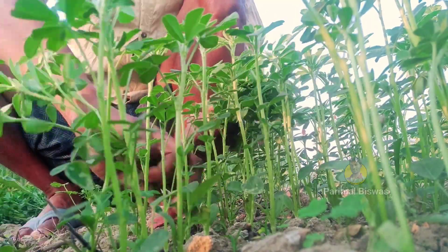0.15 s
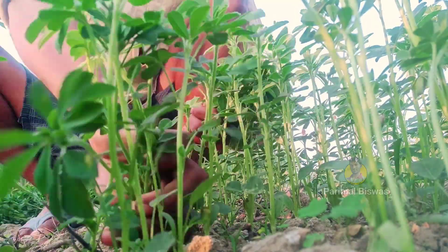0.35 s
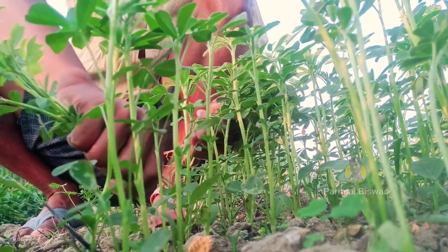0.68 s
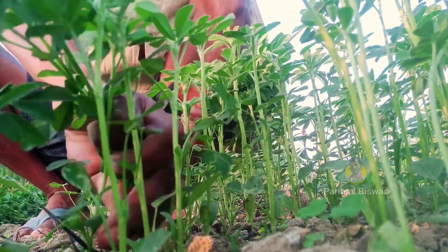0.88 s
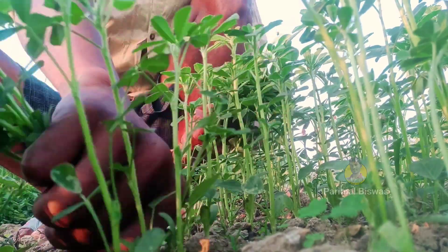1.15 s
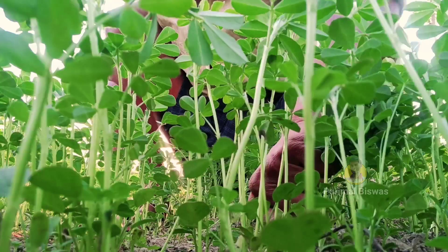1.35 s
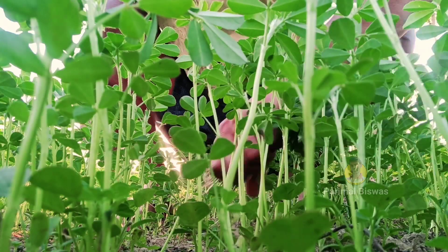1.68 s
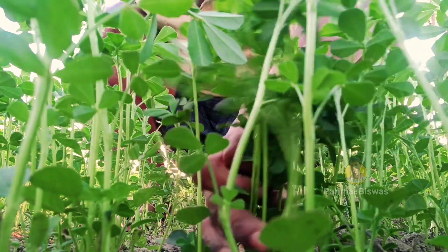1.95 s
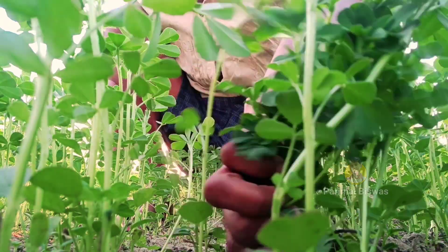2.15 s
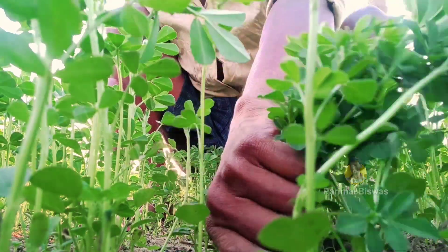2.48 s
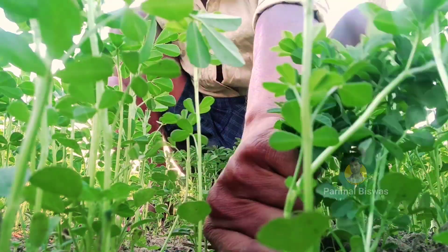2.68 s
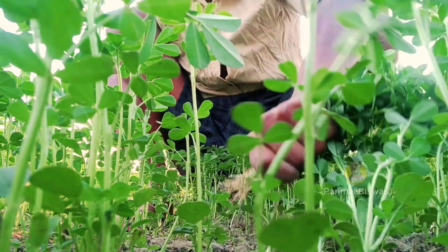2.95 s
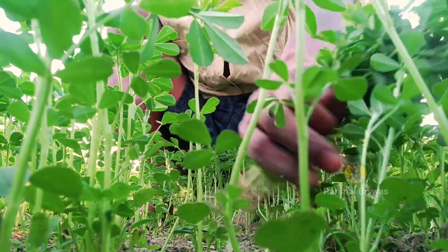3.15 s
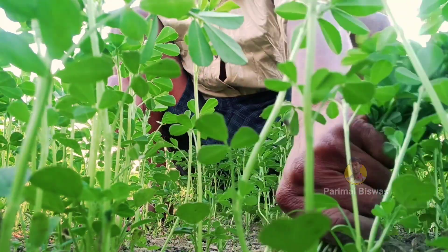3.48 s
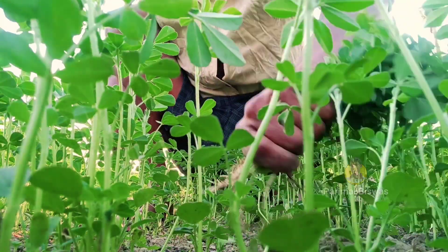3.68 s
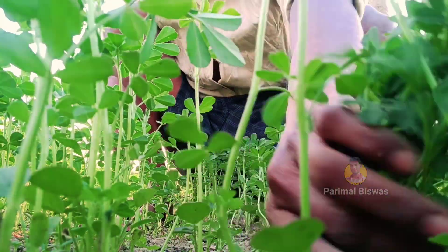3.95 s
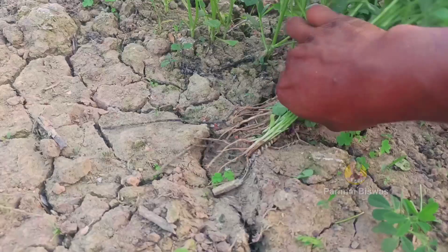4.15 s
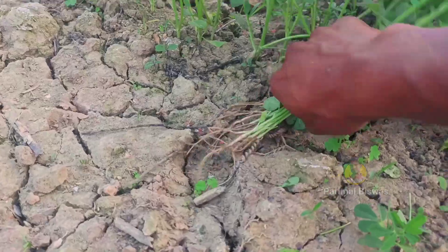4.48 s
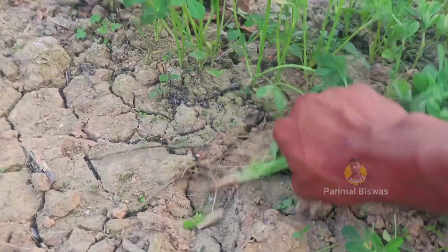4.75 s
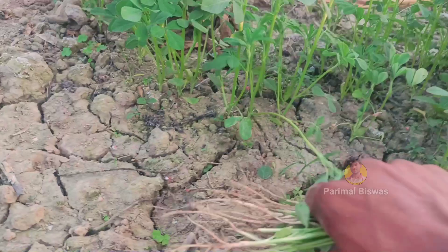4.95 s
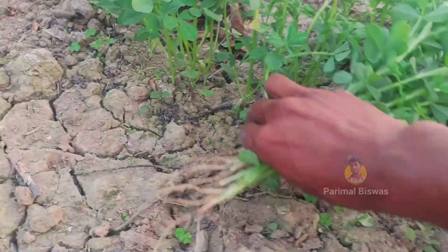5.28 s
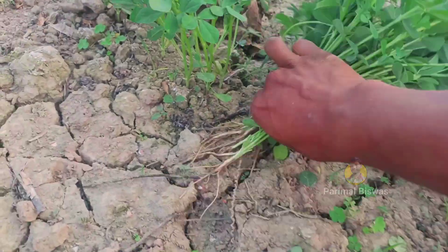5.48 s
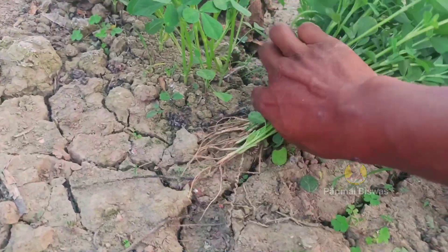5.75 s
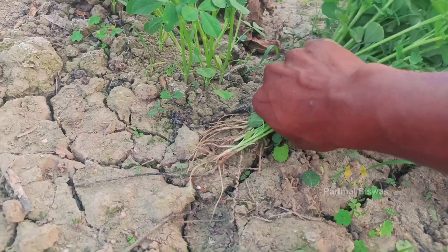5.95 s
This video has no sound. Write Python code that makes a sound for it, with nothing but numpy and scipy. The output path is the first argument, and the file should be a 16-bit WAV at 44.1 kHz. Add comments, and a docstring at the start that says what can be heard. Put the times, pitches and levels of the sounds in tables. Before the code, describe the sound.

Close to the microphone in an open field, a hand pulls bunches of leafy plants from dry soil. Leaves rustle and thin stalks tick throughout. About six pulls each bring sharp root snaps with small dull thumps and trickling crumbs, the biggest cluster near the middle. A low outdoor rumble runs underneath, and toward the end a distant bird whistles faintly.

```python
"""Bunches of leafy plants pulled by hand from dry soil, close to the microphone in an open field.
Leaves rustle and thin stalks tick in the grip. With each pull roots snap one after another:
tearing fibres ring the stem, the unloaded ground thumps, crumbs of soil trickle.
A low outdoor rumble runs underneath; late on, a bird whistles some way off."""
import sys
import numpy as np
from scipy import signal
from scipy.fft import rfft, irfft, next_fast_len
from scipy.io import wavfile
from scipy.ndimage import uniform_filter1d

SR = 44100
rng = np.random.default_rng(int(sys.argv[2]) if len(sys.argv) > 2 else 0)


def output_pcm(signal):
    """Save a mono or channel-first signal as 16-bit PCM at the path in sys.argv[1].

    Samples are clipped to [-1, 1] before scaling.
    """
    pcm = np.clip(np.atleast_2d(signal).T, -1, 1) * 32767
    wavfile.write(sys.argv[1], SR, np.round(pcm).astype(np.int16))


N = 269892
TIME_S = np.arange(N) / SR
SNAP_TIME_S = (np.arange(2048) - 256) / SR  # 0 at the break
BIN_HZ = np.arange(N // 2 + 1) * SR / N
FINE_TEAR_S = 0.0006


def from_db(db):
    """Decibels to gain."""
    return 10 ** (np.asarray(db) / 20)


def unit_rms(x):
    """Scale to rms 1."""
    return x / np.sqrt(np.mean(x ** 2) + 1e-20)


def at_hz(table, hz):
    """Interpolate each table column over log frequency."""
    knots, *columns = np.transpose(table)
    return np.array([np.interp(np.log(hz + 1e-9), np.log(knots), c) for c in columns])


def butter(x, hz, kind, order=2):
    """Causal Butterworth filter."""
    return signal.sosfilt(signal.butter(order, hz, kind, fs=SR, output="sos"), x)


def resonate(x, hz, width_hz):
    """Resonance, peak gain 1."""
    return signal.lfilter(*signal.iirpeak(hz, hz / width_hz, fs=SR), x)


def drift(rate_hz):
    """Random curve, rms 1, linear between knots."""
    knots = rng.standard_normal(int(N / SR * rate_hz) + 2)
    return unit_rms(np.interp(TIME_S * rate_hz, np.arange(len(knots)), knots))


def add(out, sound, start_s):
    """Mix in a short sound."""
    start = max(round(start_s * SR), 0)
    out[:, start:start + sound.shape[-1]] += sound[..., :N - start]


def panned(sound, pan_db):
    """Left louder than right by pan_db."""
    return sound * from_db(np.array([[pan_db], [-pan_db]]) / 2)


def grains(rate_hz, spread_db):
    """Two rows of tiny random contacts, mostly small, a few large."""
    contacts = rng.random(N) < rate_hz / SR
    sizes = from_db(spread_db * np.minimum(rng.exponential(1, N), 4))
    return unit_rms(contacts * sizes * rng.standard_normal((2, N)))


# freq_hz, left_right_correlation
COHERENCE = [(60, 1), (130, 0.67), (300, 0.45), (1300, 0.36), (2500, 0.27), (5000, 0), (15000, 0)]


def diffuse(pair, spectrum):
    """Two uncorrelated excitations to a stereo field of the given spectrum, rms 1."""
    mid, side = rfft(pair) * from_db(at_hz(spectrum, BIN_HZ))
    alike = at_hz(COHERENCE, BIN_HZ)
    return unit_rms(irfft(np.sqrt(1 + alike) * mid + np.sqrt(1 - alike) * side * [[1], [-1]], N))


# time_s, level_db
GRIP_LEVELS = [(0.03, -41.5), (0.12, -64), (0.2, -51), (0.49, -50), (0.67, -48), (0.725, -67.5),
               (0.86, -50.5), (1.25, -53.5), (1.42, -52.5), (1.72, -55), (2.15, -51), (2.4, -45.5),
               (2.63, -41.5), (2.8, -49.5), (2.99, -54), (3.29, -50.5), (3.4, -51), (3.78, -52),
               (3.95, -47.5), (4.12, -40), (4.32, -50.5), (4.45, -57.5), (4.58, -52), (4.8, -49),
               (4.98, -49), (5.42, -52), (5.64, -50), (5.79, -59.5), (5.96, -54.5), (6.1, -46)]


def grip(leaf_trim_db=-3.27, soil_mean_db=-59, soil_share=0.35):
    """Leaf and soil power from the held bunch; loose crumbs follow part of the grip's swing."""
    grip_db = np.interp(TIME_S, *np.transpose(GRIP_LEVELS))
    soil_db = soil_mean_db + soil_share * (grip_db - grip_db.mean())
    return from_db([grip_db + leaf_trim_db, soil_db]) ** 2


# centre_s, length_s, leaf_db, soil_db
BRUSH_STROKES = [(0.058, 0.082, -59, -49), (0.302, 0.095, -46.5, -51.5), (0.378, 0.034, -59, -51),
                 (0.534, 0.14, -43.5, -51.5), (0.912, 0.067, -51.5, -62), (1.005, 0.091, -43, -52.5),
                 (1.138, 0.073, -44, -55.5), (1.42, 0.045, -43, -43.5), (1.848, 0.11, -52.5, -55),
                 (1.951, 0.13, -48.5, -55.5), (2.047, 0.15, -48, -56), (2.263, 0.34, -49, -57),
                 (2.475, 0.15, -42.5, -45), (2.677, 0.038, -44, -70), (3.222, 0.034, -55, -62),
                 (3.511, 0.077, -41.5, -45), (3.868, 0.14, -49, -54), (4.047, 0.044, -47, -62),
                 (4.105, 0.036, -44, -47.5), (4.649, .28, -46.5, -57.5), (5.58, 0.3, -49.5, -57.5),
                 (5.868, 0.091, -48.5, -57.5), (6.07, 0.054, -46.5, -48)]


def brushes():
    """Leaf and soil power as the hand sweeps through plants or along the ground."""
    power = np.zeros((2, N))
    for centre_s, length_s, leaf_db, soil_db in BRUSH_STROKES:
        swell = np.cos(np.pi * np.clip((TIME_S - centre_s) / length_s, -0.5, 0.5))
        power += (from_db([[leaf_db], [soil_db]]) * swell) ** 2
    return power


def shifting(rustle, depth_db=1.6, rate_hz=35):
    """Leaf after leaf takes the rubbing: each octave swells and fades on its own."""
    octave = np.clip(np.log2((BIN_HZ + 1) / 1000), 0, 4)
    spectrum = rfft(rustle)
    bands = (irfft(spectrum * np.maximum(1 - np.abs(octave - k), 0), N) for k in range(5))
    return unit_rms(sum(band * from_db(depth_db * drift(rate_hz)) for band in bands))


# freq_hz, density_db
LEAF_SPECTRUM = [(500, -8), (1200, -3), (2500, 0), (4200, -0.5), (7000, 0.5), (10000, -1.5), (15000, -1.5)]


def leaves(level_db, trim_db=-1, flutter_db=1.47, catch_rate_hz=70, catch_decay_s=0.0046):
    """Leaves slide and crinkle; edges catch and flick free, more often in a firm grip."""
    crinkle = grains(rate_hz=1900, spread_db=3.1)
    slide = from_db(-7) * rng.standard_normal((2, N))
    firmness = from_db(level_db - np.mean(level_db))
    catches = (rng.random(N) < catch_rate_hz * firmness / SR) * rng.uniform(0, 0.49, N)
    flicks = signal.lfilter([1], [1, -np.exp(-1 / (catch_decay_s * SR))], catches + 1e-18)
    envelope = from_db(level_db + trim_db + flutter_db * drift(60)) * (1 + from_db(-2) * flicks)
    return envelope * shifting(diffuse(crinkle + slide, LEAF_SPECTRUM))


# freq_hz, density_db
SOIL_SPECTRUM = [(60, -46), (130, 1.5), (280, 4.5), (550, 1.5), (1000, -2.5), (2000, -8), (5000, -20.5)]


def soil(level_db, trim_db=1):
    """Dry crumbs shift and fall around hand and roots."""
    crumbs = grains(rate_hz=900, spread_db=5.5)
    scrape = rng.standard_normal((2, N))
    return from_db(level_db + trim_db) * diffuse(crumbs + scrape, SOIL_SPECTRUM)


# freq_hz, density_db
RUMBLE_SPECTRUM = [(25, -47), (45, -22.5), (70, -1.5), (110, 3), (170, -7), (300, -13), (700, -18.5),
                   (2000, -26), (15000, -27)]


def rumble(level_db=-50.5, swell_db=1):
    """Low, heaving background of the open field."""
    envelope = from_db(level_db + swell_db * drift(7.4))
    return envelope * diffuse(rng.standard_normal((2, N)), RUMBLE_SPECTRUM)


def burst(rise_s, decay_s, rows=1):
    """Noise with exponential rise and decay, unit energy per row."""
    envelope = np.exp(np.minimum(SNAP_TIME_S / rise_s, -SNAP_TIME_S / decay_s))
    noise = rng.standard_normal((rows, len(envelope))) * envelope
    return noise / np.linalg.norm(noise, axis=1, keepdims=True)


def whiten(x, bins):
    """Flatten the smoothed spectrum, keep the grain."""
    spectrum = rfft(x)
    power = np.abs(uniform_filter1d(np.abs(spectrum) ** 2, bins, axis=-1))
    return irfft(spectrum / np.sqrt(power + 1e-12))


def torn_fibres(tear_s, splinter_s=0.0038):
    """One sharp release within a burst of tearing, then splinters."""
    release = -1.0 * (SNAP_TIME_S == 0)
    tearing = burst(tear_s, tear_s) + from_db(-7) * burst(tear_s, tear_s, rows=2)
    splinters = burst(tear_s, splinter_s, rows=2)
    return whiten(release + from_db(-3) * tearing + from_db(-13) * splinters, bins=41)


def stalk(level_db, pan_db):
    """A thin stalk cracks: bright tick, slight ring, no thud."""
    fibres = torn_fibres(FINE_TEAR_S)
    ring = from_db(-12) * resonate(fibres, hz=2700, width_hz=1600)
    tick = butter(fibres, 6000, "high", order=3)
    return from_db(level_db) * panned(butter(ring - tick, 13000, "low"), pan_db)


# break_s, level_db, pan_db
STALK_CRACKS = [(0.54, -26, 0), (0.51, -16, -2), (0.998, -17, 2), (2.476, -12, 1), (2.523, -16, 0),
                (0.577, -26, 0), (1.012, -18, 2), (1.0983, -15, 0), (1.222, -24, 0), (1.5415, -6.5, 4),
                (2.441, -12, 4), (2.459, -12.5, 11), (2.483, -11, 2), (2.714, -14, 8.5), (2.7576, -20, 11),
                (2.8, -0.5, -20), (2.837, -7, 1), (3.5972, -16, -2), (3.6279, -9, 3), (5.649, -26, -12)]


def stalks(leaf_db, rate_hz=14, over_leaf_db=22, spread_db=3, pan_spread_db=4):
    """Stalks crack in the grip: timed ones, plus faint random ones that grow with the rustle."""
    out = np.zeros((2, N))
    for break_s, level_db, pan_db in STALK_CRACKS:
        add(out, stalk(level_db, pan_db), break_s + SNAP_TIME_S[0])
    for i in np.flatnonzero(rng.random(N) < rate_hz / SR):
        size, side = rng.standard_normal(2)
        add(out, stalk(leaf_db[i] + over_leaf_db + spread_db * size, pan_spread_db * side), TIME_S[i])
    return out


def root_crack(tear_s, crack_db, crack_hz, width_hz, tick_db, pan_db):
    """A root parts: pressure spike, brief stem ring, tick and grit of the finest fibres."""
    fibres = torn_fibres(tear_s)
    stem = resonate(resonate(fibres, crack_hz, width_hz), crack_hz, width_hz)
    spike = from_db(-15) * butter(butter(fibres, 4500, "low", order=1), 210, "high", order=1)
    tick = resonate(fibres, hz=7200, width_hz=5500)
    grit = from_db(-2) * resonate(torn_fibres(FINE_TEAR_S), hz=13500, width_hz=4000)
    crack = panned(from_db(crack_db) * (stem + spike), pan_db)
    return crack + panned(from_db(tick_db) * (tick + grit), pan_db + 4)


def root_hole(push, low_hz, high_hz, detune=0.06):
    """The hole left by the roots rings in two modes, detuned at each break."""
    low_hz, high_hz = np.array([low_hz, high_hz]) * np.exp(detune * rng.standard_normal(2))
    return resonate(push, low_hz, 0.1 * low_hz) + from_db(-10) * resonate(push, high_hz, 0.18 * high_hz)


# pitch_hz, width_hz, level_db
GROUND_MODES = [(123, 26, -7.5), (272, 110, -4), (690, 650, -6)]


def ground_thud(break_s, rise_s, crumble_s=0.0027):
    """Unloaded ground springs back; roots of one bunch share a clod and a hole."""
    nearest_pull = min(BUNCH_PULLS, key=lambda pull: abs(pull[0] - break_s))
    *_, clod_hz, clod_width_hz, clod_db, hole_low_hz, hole_high_hz, hole_db = nearest_pull
    crumbling = from_db(-10) * burst(rise_s, crumble_s) + from_db(-7) * burst(rise_s, crumble_s, rows=2)
    push = whiten(crumbling - (SNAP_TIME_S == 0), bins=9)
    clod = from_db(clod_db) * resonate(push, clod_hz, clod_width_hz)
    hole = from_db(hole_db) * root_hole(push, hole_low_hz, hole_high_hz)
    earth = sum(from_db(db) * resonate(push, hz, width_hz) for hz, width_hz, db in GROUND_MODES)
    return butter(butter(clod + hole + earth, 85, "high"), 2100, "low")


# break_s, thud_db, crack_db, crack_hz, width_hz, tick_db, tear_s, pan_db
ROOT_BREAKS = [(0.558, -16, -6, 3500, 3000, -8, 0.00022, -3), (0.6203, 12, 15, 2020, 2010, 3.5, 0.00012, 0),
               (1.318, -3, -8.5, 596, 448, -24, .001, -4), (1.346, -13, -9, 1360, 900, -12.5, 0.0024, 3),
               (1.3652, -6, -16, 900, 1200, 0, 0.00076, -3), (1.4622, 3, 2, 1640, 4870, -10, 0.00013, 2),
               (1.4949, -1, -7, 2140, 3000, -14, 0.00067, -1), (1.5035, 7.5, 5, 1570, 3000, -12, 0.0015, 2),
               (1.507, 16, 8, 4600, 5050, -6, 0.000095, 2.5), (1.533, -13, -13, 2600, 4000, -4.5, .0005, 0),
               (2.764, -23, -4, 2430, 1500, -8, 0.0007, 0),
               (2.7942, 12.5, 8, 2490, 2200, -1.5, 0.00053, 12.5),
               (2.8, 13.5, 18, 2160, 930, 3, 0.00069, -3), (2.8184, 10.5, 17.5, 1980, 850, -9, 0.00064, 1),
               (2.84, 10.5, 10, 1900, 1190, 4, 0.00038, 7), (2.852, 8, 14.5, 2070, 1500, -8, 0.0009, 3),
               (2.8615, 9, 16, 2120, 900, 2, 0.00068, 1), (2.9005, 15.5, 12, 3960, 1890, 1, 0.00015, 1.5),
               (2.9034, 4, 6.5, 2120, 1100, -10, 0.00057, 10),
               (2.9221, 4.5, 6, 1360, 2100, -20, 0.0028, 3.5),
               (3.5794, 2, -3.5, 2220, 2500, -8.5, 0.00045, -2),
               (3.6104, -15, -0.5, 1880, 750, -10.5, .0004, 0), (3.634, 8, 5, 3050, 3400, -12, 0.000054, 3),
               (3.6455, 9.5, 1.5, 2470, 3240, -14, 0.00013, -2),
               (3.6496, -10, -1, 3800, 2000, -20, .0002, 3), (3.6532, -10, -3, 3960, 2000, -19, .0003, 8),
               (3.6582, 13.5, 7.5, 2140, 2000, -6, 0.00018, -2),
               (4.1531, 1.5, -8, 2420, 1800, -5, .0005, -1), (4.158, -7, -1, 2400, 1800, -9, .00036, -2),
               (4.1736, 10, 9.5, 1710, 1910, -0.5, 0.0013, 2), (4.215, -2, 0.5, 1990, 1700, -18, .0003, 0),
               (4.2239, 17, 18.5, 1550, 2600, 11, 0.00019, -1),
               (4.2414, 0, 0.5, 1370, 1700, 3.5, 0.00013, -4), (4.259, -7, -11, 1000, 1200, -13, .0008, -5),
               (4.2701, 2.5, -5.5, 1400, 1700, -20, 0.001, -2),
               (4.773, -1.5, 4, 1480, 1400, -9, 0.00053, -4),
               (4.7937, 8.5, 10, 1360, 1200, -25, 0.00036, 1.5),
               (4.8136, 12.5, 7.5, 4080, 3420, 8.5, 0.00026, -7.5),
               (4.829, -12, -6, 1400, 1514, -10, .0012, 0), (4.8705, 9.5, 7.5, 3970, 2400, 1, 0.00036, -5),
               (4.8884, 15, 13.5, 1390, 1000, -12, 0.0014, 0.5)]


def root_snaps(right_lag_s=0.00003, thud_pan_share=0.22):
    """Each root breaks with a crack and a thud; the right port is slightly further away."""
    out = np.zeros((2, N))
    for break_s, thud_db, crack_db, crack_hz, width_hz, tick_db, tear_s, pan_db in ROOT_BREAKS:
        thud = from_db(thud_db) * panned(ground_thud(break_s, tear_s), thud_pan_share * pan_db)
        snap = root_crack(tear_s, crack_db, crack_hz, width_hz, tick_db, pan_db) + thud
        snap[1] = np.interp(SNAP_TIME_S - right_lag_s, SNAP_TIME_S, snap[1])
        add(out, snap, break_s + SNAP_TIME_S[0])
    return out


# start_s, hold_s, settle_s, leaf_db, soil_db,
# clod_hz, clod_width_hz, clod_db, hole_low_hz, hole_high_hz, hole_db
BUNCH_PULLS = [(0.619, .0061, 0.036, -63, -51, 182, 70, 3, 353, 780, 4),
               (1.515, 0.023, 0.035, -38.5, -46.5, 243, 75, 4, 404, 745, 7.5),
               (2.819, 0.09, 0.067, -38.5, -46, 163, 110, 1.5, 433, 1020, -1),
               (3.571, 0.1, 0.039, -43, -50.5, 222, 100, 1, 493, 800, -4),
               (4.147, 0.129, 0.0044, -39.5, -52, 160, 145, -0.5, 625, 960, -6),
               (4.783, 0.17, .03, -43, -54, 117, 54.6, 7, 642, 1290, -4)]


def pulls(attack_s=0.0071):
    """Leaf and soil power as each bunch is drawn out: attack, hold, settle."""
    power = np.zeros((2, N))
    for start_s, hold_s, settle_s, leaf_db, soil_db, *_ in BUNCH_PULLS:
        rise = (TIME_S - start_s) / attack_s
        fall = (start_s + hold_s - TIME_S) / settle_s
        strain = np.exp(np.clip(np.minimum(rise, fall), -20, 0))
        power += (from_db([[leaf_db], [soil_db]]) * strain) ** 2
    return power


# start_s, length_s, start_hz, middle_hz, end_hz, level_db
BIRD_WHISTLES = [(4.35, .035, 2750, 2820, 2850, -61), (4.455, .05, 2000, 2300, 2200, -59),
                 (4.52, .06, 2300, 2200, 2000, -59), (4.935, .035, 2100, 2000, 1850, -48),
                 (5.058, .108, 2440, 2310, 2400, -45), (5.07, .07, 2190, 2120, 2150, -54),
                 (5.108, .065, 4450, 4200, 3780, -61), (5.271, .021, 1950, 1660, 2000, -44),
                 (5.29, .026, 2100, 2130, 2060, -51), (5.315, .016, 2050, 1850, 2080, -46),
                 (5.352, .052, 2250, 2090, 1700, -40), (5.4, .042, 1900, 1760, 1380, -48),
                 (5.39, .14, 3450, 3150, 2900, -61), (5.975, .05, 3100, 3380, 3550, -64),
                 (5.675, .09, 4420, 4200, 3850, -62), (5.835, .075, 3600, 3680, 3640, -57)]


def bird(waver_depth=0.004, rasp_depth=0.035, flutter_db=2.5, scatter_db=-12):
    """Gliding whistles, shakier and raspier the wider they sweep, scattered by the plants."""
    out = np.zeros((2, N))
    waver, flutter = drift(390), drift(160)
    rasp = drift(800) + 1j * drift(800)
    for start_s, length_s, start_hz, middle_hz, end_hz, level_db in BIRD_WHISTLES:
        progress = np.linspace(0, 1, int(length_s * SR))
        span = int(start_s * SR) + np.arange(len(progress))
        glide_hz = np.polyval(np.polyfit([0, 0.5, 1], [start_hz, middle_hz, end_hz], 2), progress)
        strain = min(10 * np.ptp(glide_hz) / middle_hz, 2)
        pitch_hz = glide_hz * (1 + waver_depth * strain * waver[span])
        swell = np.sqrt(np.abs(np.sin(np.pi * progress)))
        tone = np.exp(2j * np.pi * np.cumsum(pitch_hz) / SR)
        tone *= 1 + rasp_depth * strain ** 2 * rasp[span]
        add(out, from_db(level_db + flutter_db * flutter[span]) * swell * tone.imag, start_s)
    scatter = burst(rise_s=0.0029, decay_s=0.074, rows=2)
    return out + from_db(scatter_db) * signal.fftconvolve(out, scatter, axes=1)[:, :N]


def scene():
    """Pulling close by, bird and rumble far off."""
    leaf_db, soil_db = 10 * np.log10(grip() + brushes() + pulls())
    return root_snaps() + stalks(leaf_db) + leaves(leaf_db) + soil(soil_db) + bird() + rumble()


# freq_hz, left_db, right_db
TREBLE_COLOUR = [(2670, 0.5, 0.5), (4740, 5.5, 5.5), (4600, 0, -2.5), (6154, 1, 2), (6100, 9, 5.5),
                 (7723, 11.5, 7), (7770, 5, -23), (8240, -2.5, 10.5), (8820, -8.5, -6), (11600, -24, -32),
                 (11580, -2, -0.5), (14800, 0.5, 2.5), (15700, -3, -1), (16000, -18, -33)]


def record(dry):
    """Overall tone: treble peaks, a deep gap at 9-11.5 kHz, clipping at full scale, steep low-pass."""
    size = next_fast_len(N + SR)
    hz = np.arange(size // 2 + 1) * SR / size
    coloured = irfft(rfft(dry, size) * from_db(at_hz(TREBLE_COLOUR, hz)), size)[:, :N]
    low_pass = signal.cheby2(12, 60, 17000, fs=SR, output="sos")
    return signal.sosfilt(low_pass, np.clip(coloured, -1, 1))


dry = scene()
out = record(dry)
output_pcm(out)
```